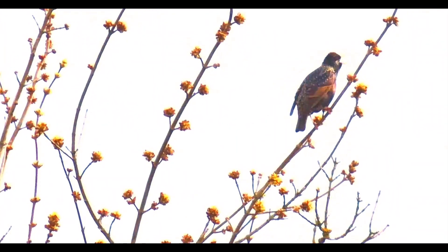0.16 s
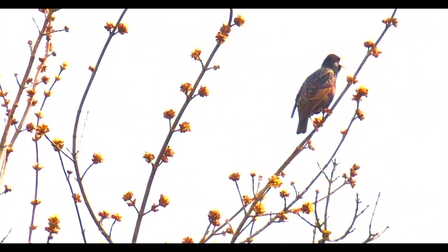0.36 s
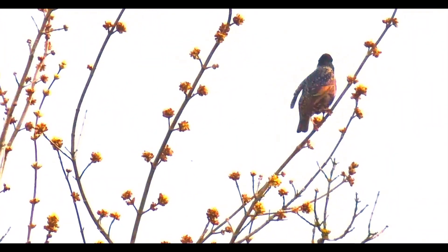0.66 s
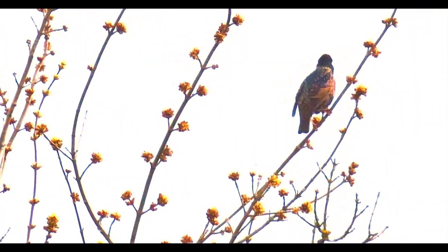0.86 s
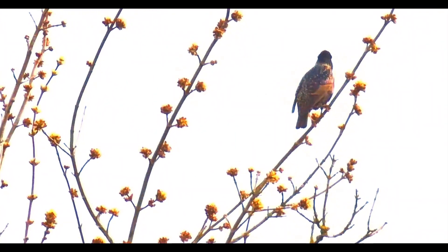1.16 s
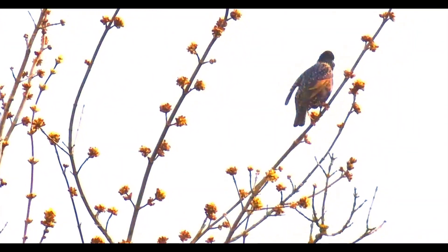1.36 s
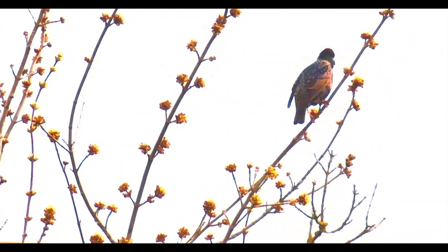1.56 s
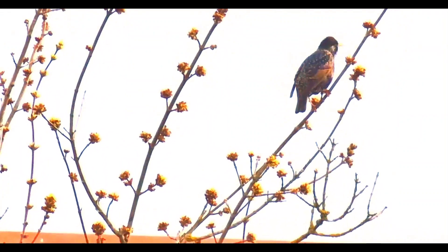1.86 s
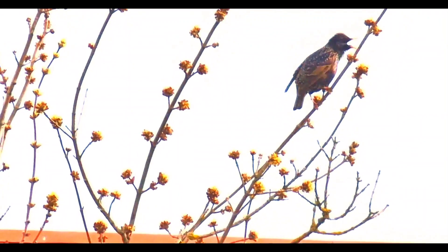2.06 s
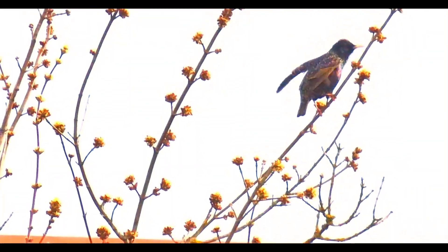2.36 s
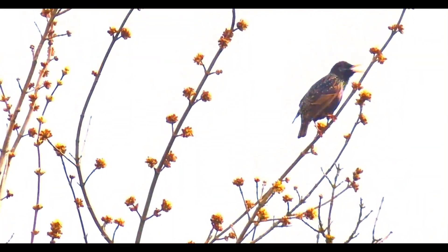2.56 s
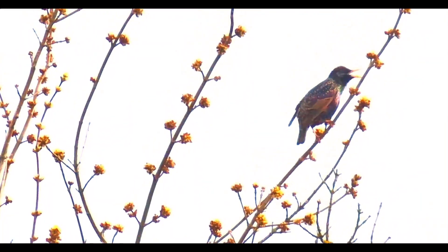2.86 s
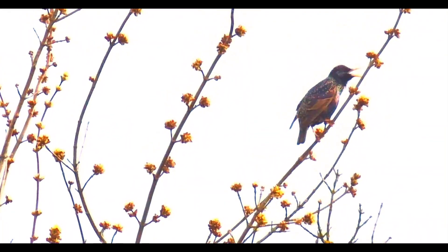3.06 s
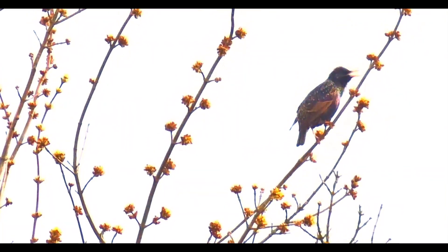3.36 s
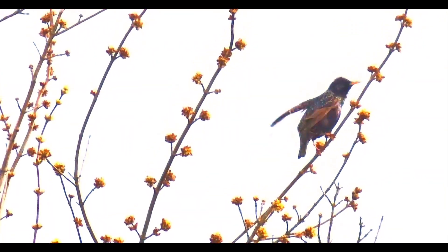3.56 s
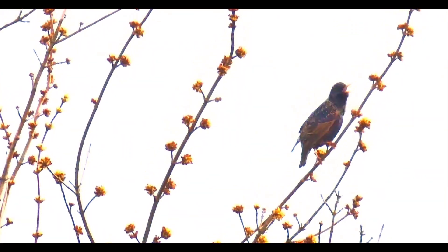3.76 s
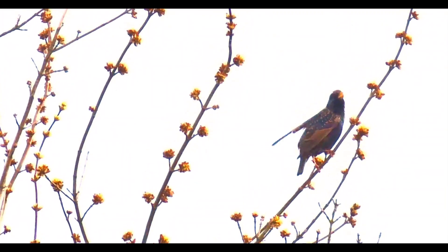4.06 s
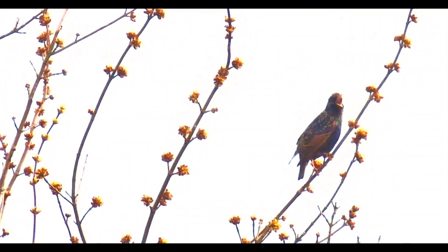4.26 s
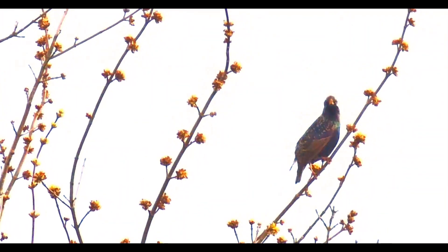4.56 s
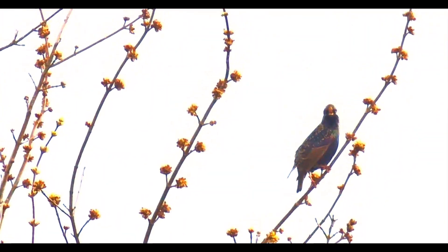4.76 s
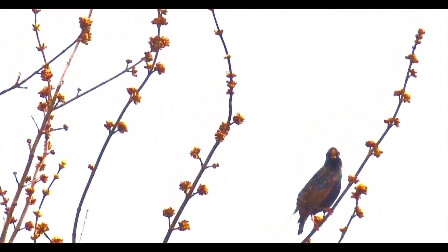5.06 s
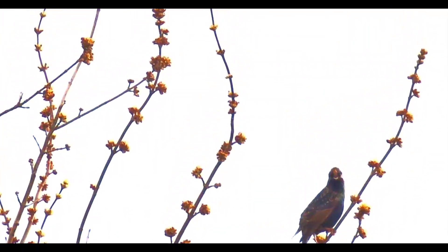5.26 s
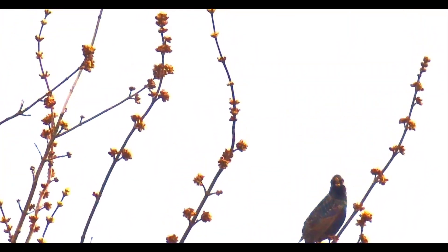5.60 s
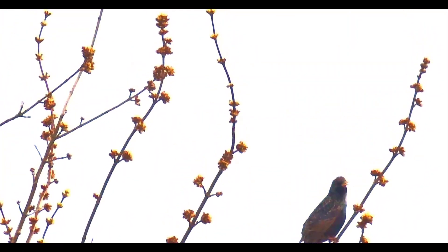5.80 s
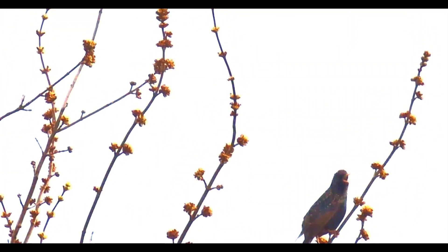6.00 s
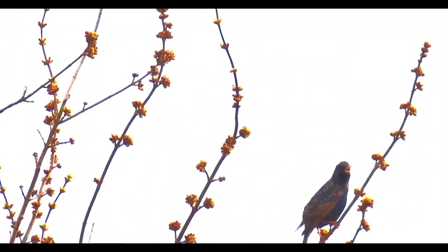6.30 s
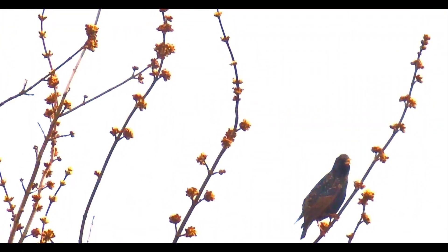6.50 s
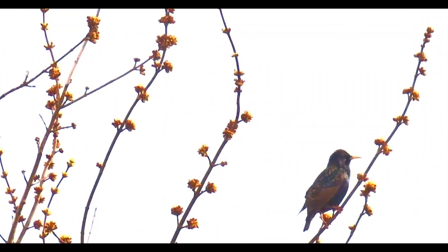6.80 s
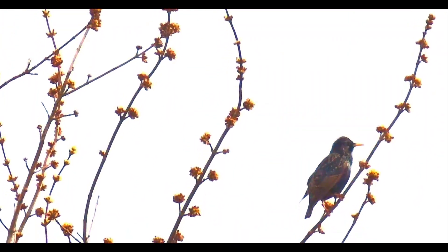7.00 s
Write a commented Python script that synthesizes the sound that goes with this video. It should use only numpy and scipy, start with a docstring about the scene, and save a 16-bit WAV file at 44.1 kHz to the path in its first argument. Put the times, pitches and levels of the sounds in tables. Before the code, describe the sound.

A starling rasps, trills thinly, clucks and whistles from a treetop among houses, over the steady rush and low drone of distant traffic.

```python
"""Starling among houses

A starling sings in a tree: rasps, high trills, clucks, and rising whistles that tumble down in pips.
Each voice is a sine on a moving pitch, roughened by random wobble and fast sweeps.
The song echoes off the walls, through decaying noise, and reaches two spaced microphone ports.
Behind it, shaped noise makes the steady rush of far traffic, and two wavering tones a low engine drone.
"""
import sys
import numpy as np
from scipy import signal
from scipy.fft import rfft, irfft, next_fast_len
from scipy.io import wavfile
from scipy.ndimage import map_coordinates

SR = 44100
rng = np.random.default_rng(int(sys.argv[2]) if len(sys.argv) > 2 else 0)


def to_wav(s):
    """Save 16-bit WAV."""
    ch = np.atleast_2d(s).T  # columns
    pcm = np.round(np.clip(ch, -1, 1) * 32767)  # PCM
    wavfile.write(sys.argv[1], SR, pcm.astype(np.int16))


N = 314874
TIME = np.arange(N) / SR

# Song levels are at the bird, before its facing and the yard; t is the onset.
# high pulsing trills; the swell's peak is counted from the onset and may lie past the end:
# (t/s, length/s, swell peak/s, start f/Hz, end f/Hz, peak level/dB, swell/dB)
TRILLS = [(2.149, 0.28, .13, 8740, 8590, -61.5, 5.5), (2.949, .282, 0.29, 8900, 8460, -57.5, 14.5),
          (3.779, 0.27, 0.35, 8860, 8430, -54.5, 7.5)]
DROP_S, DROP_HZ, DROP_DB = 0.029, 387, 5.5  # a trill ends in a quick droop
# rasps, a tone swept up and down very fast; the peak may lie past the end:
# (t/s, length/s, swell peak/s, start f/Hz, end f/Hz, sweep either side f/Hz, peak level/dB)
RASPS = [(0.105, 0.27, .19, 8610, 7050, 610, -60.5), (0.413, 0.17, 0.022, 6940, 8260, 1200, -63.5),
         (0.866, 0.08, 0.079, 7250, 6900, 655, -64), (0.933, 0.11, 0.02, 7450, 8000, 1100, -64),
         (1.074, .17, .035, 6660, 8480, 1150, -60.5), (1.564, .065, 0.075, 7120, 6990, 680, -65.5),
         (1.638, 0.1, 0.014, 7560, 7880, 880, -62), (1.772, 0.19, 0.066, 6770, 8680, 1080, -61.5)]
RASP_RISE_DB, RASP_FALL_DB = 11.5, 9.5  # swell and fade
RASP_SETTLE = 2  # exponent: higher settles the centre pitch earlier
CEILING_HZ = 8640  # the sweeps narrow as they near the top of the voice
# soft warbles from the low side of the syrinx: (t/s, length/s, start f/Hz, end f/Hz, level/dB)
WARBLES = [(0.197, 0.04, 4860, 3600, -67), (0.438, 0.13, 4990, 3870, -75), (1.107, .14, 5000, 3980, -74),
           (1.82, .14, 4660, 4080, -75.5), (2.613, 0.082, 5410, 4370, -75.5),
           (3.436, 0.13, 5170, 4050, -76), (5.607, 0.028, 5000, 4740, -74.5),
           (6.137, 0.062, 4700, 4610, -75.5)]
# slurs, plain gliding whistles: (t/s, length/s, start f/Hz, end f/Hz, level/dB)
SLURS = [(0.353, 0.068, 4800, 5730, -72.5), (0.793, 0.031, 4620, 4440, -75),
         (1.022, 0.067, 4830, 6040, -71), (1.48, 0.043, 4600, 4400, -76), (1.711, 0.053, 5060, 6150, -69.5),
         (4.25, 0.064, 6130, 7000, -83.5), (4.623, .08, 7260, 8400, -76.5),
         (5.136, 0.04, 6340, 6830, -76.5), (5.464, 0.11, 7100, 8380, -75), (7.062, 0.067, 4590, 4450, -84)]
# climbs, long whistles that scoop up to a shelf and then lift: (t/s, lift t/s, end t/s, shelf f/Hz, level/dB)
CLIMBS = [(4.594, 4.802, 4.855, 7170, -58.5), (5.424, 5.641, 5.705, 7154, -60)]
SCOOP_HZ, SCOOP_DB = 2000, 19  # how far below the shelf the whistle starts
SCOOP_S, CREEP_HZ_PER_S = .098, 2300  # time to reach the shelf, and the slow rise along it
LIFT_S, LIFT_HZ, LIFT_DB = .035, 510, -3.5  # the last step up
# quavers, rising whistles that break into slow vibrato: (t/s, length/s, start f/Hz, end f/Hz, level/dB)
QUAVERS = [(5.923, .265, 6470, 7820, -67)]
SWAY_AFTER_S = .114
# cascades, runs of falling pips, before the voice's strength by pitch:
# (t/s, length/s, top f/Hz, bottom f/Hz, first pip level/dB, last pip level/dB, lead-in flick level/dB)
CASCADES = [(4.366, 0.12, 7830, 4550, -43.5, -43, -52.5), (4.872, 0.04, 8340, 6270, -45.5, -42.5, -48),
            (5.217, .138, 8300, 4287, -41, -44, -57), (6.211, 0.1, 8040, 4200, -49.5, -41, -64)]
PIP_GAP_S = .017  # nominal; each run rounds to whole steps
# strength of a pip by its pitch: (f/Hz, level/dB)
PIP_VOICE = [(4200, -17.5), (4650, -13), (5500, -15.5), (6100, -19), (6500, -9.5), (7000, -9.5),
             (7400, -1.5), (8300, -2.5)]
# hiccups that announce each trill: (t/s, level/dB, held f/Hz)
HICCUPS = [(2.067, -61.5, 4630), (2.865, -63, 4620), (3.701, -60.5, 4840)]
# clucks: (t/s, level/dB, relative level of the last step/dB)
CLUCKS = [(4.152, -47.5, -14), (4.997, -51, -10), (5.804, -51.5, -6)]
# the first steps of one cluck: (delay t/s, length/s, f/Hz, relative level/dB)
CLUCK_STEPS = [(0, .03, 3095, -3), (0.015, 0.027, 2535, -4.5)]
# short bill ticks: (t/s, f/Hz, level/dB, pitch scatter f/Hz)
TICKS = [(.098, 3320, -67, 200), (.155, 3730, -67, 100), (5.682, 4200, -63.5, 900)]

# the bird turns its head towards the microphone: (t/s, direct sound level/dB)
FACING = [(1.9, -8), (2.1, -4)]
# decay time of the tail among the houses: (f/Hz, t60/s)
YARD_T60 = [(3000, 0.42), (5000, 1), (9000, 0.71)]
# the bird's balance at the two ports: (f/Hz, left minus right level/dB)
PORT_LEAN = [(3100, 0.5), (4400, -13.5), (6500, -6), (8000, -10.5)]
# phase by which the left port leads: (f/Hz, phase/rad)
PORT_LEAD = [(3000, 0.65), (4600, 2.4), (7000, 4.77), (8600, 3.8)]

# relative spectrum of the tyre rush: (f/Hz, level per Hz/dB)
TYRE_SPECTRUM = [(150, -0.5), (300, -3.5), (420, -5.5), (720, 1), (880, -2), (1030, 3.5), (1200, -4),
                 (1470, 0.5), (1800, -2), (2300, -15.5), (3000, -23), (9000, -34)]
# narrow humming bands in the traffic: (f/Hz, boost level/dB)
STREET_HUMS = [(246, 4), (310, 2.5), (665, 2.5), (750, 2.5), (1000, 0.5), (1060, 6.5), (1296, 5), (1470, 9),
               (1600, 1.5)]
# relative spectrum of the low rumble: (f/Hz, level per Hz/dB)
RUMBLE_SPECTRUM = [(15, -26), (30, -6), (47, 1), (60, 0), (110, -4), (160, -10.5), (220, -20), (350, -31.5),
                   (700, -75)]
# likeness of the noise at the two ports: (f/Hz, left-right correlation)
PORT_LIKENESS = [(100, 0.81), (250, 0.76), (1500, 0.46), (4000, 0.011)]
# engine pitches before waver: (t/s, low tone f/Hz, high tone f/Hz)
ENGINE_HZ = [(0, 73.85, 133), (2.85, 75.27, 128.1), (3.5, 93.3, 131.7), (4.7, 96.23, 134.2),
             (7.1, 93.76, 136.9)]
# engine's low exhaust tone, before trim and flutter: (t/s, level/dB)
ENGINE_LOW = [(0.0, -55), (0.54, -42.5), (0.79, -68.5), (1.31, -49.5), (1.83, -60.5), (2.26, -45.5),
              (2.5, -49.5), (2.62, -57), (2.82, -45.5), (4.06, -53.5), (4.53, -42.5), (5.01, -42),
              (5.37, -58), (5.69, -42.5), (6.42, -39.5), (6.48, -47), (6.94, -44), (7.14, -49.5)]
# engine's high tone, far off and then nearer, before trim and flutter: (t/s, level/dB)
ENGINE_HIGH = [(0.0, -83), (0.35, -63), (2.08, -68.5), (2.4, -53), (2.45, -57), (2.63, -46), (3.36, -58.5),
               (3.56, -46.5), (3.64, -60), (3.71, -47), (3.98, -62), (4.78, -51), (5.32, -63), (5.43, -47),
               (5.88, -47), (6.92, -58), (7.0, -47.5), (7.1, -50)]
PORT_LAG = 16 / SR  # s, the street reaches the left port this much later
TOP_HZ = 15700  # band limit of the microphone path


def amp(db):
    """Decibels to gain."""
    return 10 ** (np.asarray(db) / 20)


def unit(x):
    """Scale to rms 1."""
    return x / np.sqrt(np.mean(x ** 2) + 1e-20)


def along(points, hz):
    """(Hz, value) points read on a log axis."""
    f, v = np.transpose(points)
    return np.interp(np.log(hz + 1), np.log(f + 1), v)


def curves(rows, t):
    """Each column after the time, read at times t."""
    s, *cols = np.transpose(rows)
    return [np.interp(t, s, c) for c in cols]


def wobble(rate, t):
    """A smooth random curve with rate knots a second."""
    u = (t - t[0]) * rate
    return map_coordinates(rng.standard_normal(int(u[-1]) + 4), [u + 1], mode="mirror")


def turns(hz):
    """Running phase of a moving frequency."""
    return 2 * np.pi * np.cumsum(hz) / SR


def tone(hz):
    """A sine of rms 1 on a moving pitch."""
    return np.sqrt(2) * np.sin(turns(hz))


def filtered(x, response):
    """x times a response of frequency."""
    m = next_fast_len(N + SR // 2)
    return irfft(rfft(x, m) * response(np.fft.rfftfreq(m, 1 / SR)), m)[..., :N]


def add(track, s, sound):
    """Mix a sound into the track at time s."""
    part = track[max(round(s * SR), 0):][:len(sound)]
    part += sound[:len(part)]


def ramp(t, start, length):
    """Rises from 0 to 1 over length seconds from start."""
    return np.clip((t - start) / max(length, .001), 0, 1)


def note(length, fade):
    """Time since the start of a note, its progress 0-1, and its soft-edged gate."""
    t = np.arange(-fade / 2, max(length, .01) + fade / 2, 1 / SR)
    edge = np.clip(np.minimum(t - t[0], t[-1] - t) / fade, 0, 1)
    return t, np.clip(t / length, 0, 1), np.sin(edge * np.pi / 2) ** 2


def pip(hz, length, glide, rough_hz=110):
    """A short, slightly rough tone whose pitch slides by the share glide."""
    u = np.linspace(0, 1, round(length * SR))
    pitch = hz * (1 + glide * (u - .5)) + rough_hz * wobble(900, u * length)
    return np.sin(np.pi * u) ** 2 * tone(pitch)


def whistle(t, hz, db, waver=0.011, flutter_db=2.5):
    """A thin tone with a slight quiver."""
    return amp(db + flutter_db * wobble(98, t)) * tone(hz * (1 + waver * wobble(500, t)))


def starling(bright_hz=9000, wall_lean=0.39):
    """The whole song in its yard; the treble favours the right port and reaches the two out of step."""
    song = slurs() + climbs() + quavers() + trills() + hiccups() + rasps() + warbles() + cascades() + clucks()
    song = filtered(song, lambda hz: 1 / np.sqrt(1 + (hz / bright_hz) ** 60))
    direct_db, = curves(FACING, TIME)
    ports = np.array([[.5], [-.5]])

    def to_ports(hz):
        return amp(ports * along(PORT_LEAN, hz)) * np.exp(1j * ports * along(PORT_LEAD, hz))

    direct = filtered(song * amp(direct_db), to_ports)
    # what the bill does not send this way goes to the walls
    echoes = yard(song * amp(-direct_db / 2))
    walls = filtered(echoes, lambda hz: amp(wall_lean * ports * along(PORT_LEAN, hz)))
    return direct + walls


def slurs():
    """Quiet whistles that glide straight from one pitch to another."""
    out = np.zeros(N)
    for s, length, from_hz, to_hz, db in SLURS:
        t, u, gate = note(length, fade=0.012)
        add(out, s + t[0], gate * whistle(t, from_hz + (to_hz - from_hz) * u, db))
    return out


def climbs(bend=0.71):
    """The whistle gains strength as it scoops up, creeps along its shelf, then lifts and thins."""
    out = np.zeros(N)
    for s, lift_s, end_s, shelf_hz, db in CLIMBS:
        t, u, gate = note(end_s - s, fade=.015)
        below, lift = 1 - ramp(t, 0, SCOOP_S), ramp(t, lift_s - s, LIFT_S)
        creep_hz = CREEP_HZ_PER_S * np.maximum(t - SCOOP_S, 0)
        hz = shelf_hz - SCOOP_HZ * below ** bend + creep_hz + LIFT_HZ * lift
        add(out, s + t[0], gate * whistle(t, hz, db - SCOOP_DB * np.sqrt(below) + LIFT_DB * lift))
    return out


def quavers(vibrato_hz=19, swing_hz=330, throb_db=4, rise_db=17, fade_db=6):
    """A faint rising whistle swells and starts to sway, loudest at the top of each sway."""
    out = np.zeros(N)
    for s, length, from_hz, to_hz, db in QUAVERS:
        t, u, gate = note(length, fade=0.017)
        sway = np.sin(2 * np.pi * vibrato_hz * np.maximum(t - SWAY_AFTER_S, 0))
        rise = rise_db * (ramp(t, 0, SWAY_AFTER_S) ** 2 - 1)
        fall = fade_db * ramp(t, SWAY_AFTER_S, length - SWAY_AFTER_S)
        hz = from_hz + (to_hz - from_hz) * u + swing_hz * sway
        add(out, s + t[0], gate * whistle(t, hz, db + rise - fall + throb_db * sway))
    return out


def trills(pulse_hz=115, depth=0.44, swing_hz=70, under_db=-22, strand_db=-23, strand_hz=7520, rough_hz=50):
    """A high tone pulses fast as it sinks and swells, over a weak second strand and an octave-down partial."""
    out = np.zeros(N)
    for s, length, peak_s, from_hz, to_hz, db, swell_db in TRILLS:
        t, u, gate = note(length, fade=0.0072)
        droop = ramp(t, length - DROP_S, DROP_S)
        swell = -swell_db * abs(t / peak_s - 1)
        loud = gate * amp(db + swell - DROP_DB * droop + 3.1 * wobble(60, t))
        beat = turns(pulse_hz * (1 + 0.034 * wobble(38.6, t)))
        hoarse_hz = rough_hz + 300 * np.exp(-(t - t[0]) / 0.071)  # the note starts hoarse, then settles
        glide_hz = from_hz + (to_hz - from_hz) * u - DROP_HZ * droop
        hz = glide_hz + swing_hz * np.sin(beat) + hoarse_hz * wobble(900, t)
        low = amp(under_db) * tone(hz / 2 + 300 * np.sin(beat))
        # the strand peaks early in the note
        strand_level = strand_db + 6.5 - 44 * abs(t - .075)
        strand = amp(strand_level) * tone(strand_hz + 150 * wobble(800, t))
        add(out, s + t[0], loud * (1 + depth * np.cos(beat)) * (tone(hz) + low + strand))
    return out


def hiccups(sweep_db=-7, octave_db=-2, held_db=-3):
    """Two scratchy upward flicks with their octaves, then a hoarse tone that scoops up to its pitch and fades."""
    out = np.zeros(N)
    t, held_t = (np.arange(round(d * SR)) / SR for d in (.024, .07))
    u = t / t[-1]
    for s, db, held_hz in HICCUPS:
        for delay in (0, .018):
            hz = 2700 + 1700 * u + 200 * wobble(1550, t)
            flick = tone(hz) + amp(octave_db) * tone(2 * hz)
            add(out, s + delay, amp(db + sweep_db) * np.sin(np.pi * u) * flick)
        hz = held_hz - 1500 * np.exp(-held_t / .008) + 120 * wobble(700, held_t)
        add(out, s + 0.015, amp(db + held_db) * np.sin(np.pi * held_t / held_t[-1]) * tone(hz))
    return out


def rasps(sweep_rate_hz=200, scatter=0.08, flutter_db=3.0):
    """Uneven fast sweeps smear the tone into a scratchy band, which swells, settles in pitch and fades."""
    out = np.zeros(N)
    for s, length, peak_s, from_hz, to_hz, width_hz, db in RASPS:
        t, u, gate = note(length, fade=0.019)
        centre = to_hz + (from_hz - to_hz) * (1 - u) ** RASP_SETTLE
        rise = RASP_RISE_DB * (1 - ramp(t, 0, peak_s))
        fall = RASP_FALL_DB * ramp(t, peak_s, length - peak_s)
        beat = turns(sweep_rate_hz * (1 + 0.33 * wobble(120, t)))
        width = np.minimum(width_hz, CEILING_HZ - centre)
        hz = centre + width * (np.sin(beat) + scatter * wobble(2000, t))
        loud = gate * amp(db - rise - fall + flutter_db * wobble(107, t))
        add(out, s + t[0], loud * (1 + 0.3 * np.cos(beat)) * tone(hz))
    return out


def warbles(shake_hz=75, swing_hz=200, rough_hz=120):
    """Quiet falling notes with a wide, rough vibrato that also pulses their loudness."""
    out = np.zeros(N)
    for s, length, from_hz, to_hz, db in WARBLES:
        t, u, gate = note(length, fade=0.0084)
        beat = turns(shake_hz * (1 + 0.15 * wobble(50, t)))
        hz = from_hz + (to_hz - from_hz) * u + swing_hz * np.sin(beat) + rough_hz * wobble(800, t)
        add(out, s + t[0], gate * amp(db) * (1 + .5 * np.cos(beat)) * tone(hz))
    return out


def cascades(length=.0125, glide=-0.04, split_db=-6, split_below_hz=5500, flick_s=0.019, flick_rise_db=16,
             stray=0.009):
    """An upward flick, then pips in near-even steps down; the low ones scatter a rough band above them."""
    out = np.zeros(N)
    t = np.arange(round(0.045 * SR)) / SR
    for start, run_s, top_hz, bottom_hz, first_db, last_db, flick_db in CASCADES:
        flick_t, u, gate = note(flick_s, fade=.008)
        flick = gate * whistle(flick_t, 7200 + 1400 * u, flick_db - flick_rise_db * (1 - u))
        add(out, start - PIP_GAP_S - flick_s, flick)
        for step in np.linspace(0, 1, round(run_s / PIP_GAP_S) + 1):
            s = start + run_s * step - length / 2
            hz = top_hz * (bottom_hz / top_hz) ** step
            loud = amp(first_db + (last_db - first_db) * step + along(PIP_VOICE, hz))
            add(out, s, loud * pip(hz * (1 + stray * rng.standard_normal()), length, glide))
            if hz < split_below_hz:
                band = np.hanning(len(t)) * tone(hz * (1.15 + 0.14 * wobble(1500, t)))
                add(out, s, loud * amp(split_db) * band)
    return out


def clucks(scrape_db=-13, scrape_hz=4000, scrape_spread_hz=450, last_hz=1750, burr_db=-23, burr_hz=4050,
           tick_t60=0.15):
    """A scrape opens three tones that step down, then a soft burr follows; the bill ticks now and then."""
    out = np.zeros(N)
    t, burr_t = (np.arange(round(d * SR)) / SR for d in (.03, .17))
    for s, db, last_db in CLUCKS:
        scrape = np.hanning(len(t)) ** .5 * tone(scrape_hz + scrape_spread_hz * wobble(2000, t))
        add(out, s - .003, amp(db + scrape_db) * scrape)
        for delay, length, hz, step_db in CLUCK_STEPS + [(.028, .035, last_hz, last_db)]:
            add(out, s + delay, amp(db + step_db) * pip(hz, length, glide=0.033, rough_hz=96))
        burr = np.hanning(len(burr_t)) * tone(burr_hz + 200 * wobble(1100, burr_t))
        add(out, s + 0.049, amp(db + burr_db) * burr)
    for s, hz, db, scatter_hz in TICKS:
        decay = amp(db - 60 * t / tick_t60) * ramp(t, 0, .002)
        add(out, s - .003, decay * tone(hz + scatter_hz * wobble(1500, t)))
    return out


def yard(song, near_db=-8.5, near_t60=0.12, far_db=-11):
    """Near roofs blur the song and the houses around give a thin tail, both as decaying noise."""
    hz, t, z = signal.stft(rng.standard_normal((2, SR)), SR, nperseg=256)
    decay = amp(-60 * t / along(YARD_T60, hz)[:, None])
    tail = signal.istft(z * decay, SR, nperseg=256)[1][:, :SR]
    near = rng.standard_normal((2, SR)) * amp(-60 * TIME[:SR] / near_t60)
    answer = (amp(far_db) * unit(tail) + amp(near_db) * unit(near)) / np.sqrt(SR)
    return signal.fftconvolve(song[None], answer, axes=1)[:, :N]


def traffic(tyres_db=-58, rumble_db=-54, hiss_db=-85):
    """Far tyres rush over a low rumble, both shaped noise; a faint high hiss lies on top."""
    tyres = amp(tyres_db + 0.53 * wobble(6, TIME)) * rush(TYRE_SPECTRUM, STREET_HUMS)
    tyres = tyres * amp([[.7], [-.7]])  # a little louder at the left port
    tyres = filtered(tyres, lambda hz: 1 / np.sqrt(1 + (hz / 8500) ** 10))
    rumble = amp(rumble_db) * rush(RUMBLE_SPECTRUM)
    hiss = filtered(rng.standard_normal((2, N)), lambda hz: amp(along([(10000, -38.0), (11300, 4)], hz)))
    return tyres + rumble + amp(hiss_db) * hiss


def rush(spectrum, bands=(), width_hz=18):
    """Coloured stereo noise of rms 1 with narrow raised bands, most alike at both ports in the bass."""
    def colour(hz):
        raised = sum(db / (1 + ((hz - f) / width_hz) ** 2) for f, db in bands)
        return amp(along(spectrum, hz) + raised)

    def mid_side(hz):
        # the angle between mid and side sets the left-right likeness
        turn = np.arccos(np.clip(along(PORT_LIKENESS, hz), -1, 1)) / 2
        return colour(hz) * [np.cos(turn), np.sin(turn)]

    mid, side = filtered(rng.standard_normal((2, N)), mid_side)
    return unit(np.array([mid + side, mid - side]))


def engine(waver=0.01765, flutter_db=2, flutter_rate=14, low_db=-2.0, high_db=-1.5):
    """Two low exhaust tones waver, swell and fade on their way over the roofs."""
    low_hz, high_hz = curves(ENGINE_HZ, TIME)

    def level(rows, trim_db):
        return amp(trim_db + curves(rows, TIME)[0] + flutter_db * wobble(flutter_rate, TIME))

    def drone(hz):
        return tone(hz * (1 + waver * wobble(flutter_rate, TIME)))

    low = level(ENGINE_LOW, low_db) * drone(low_hz) * amp([[-1], [1]])  # leans to the right port
    return low + level(ENGINE_HIGH, high_db) * drone(high_hz)


def scene():
    """The bird sings ahead; the street reaches the right port a moment before the left."""
    sides = np.array([[1], [-1]])
    street = filtered(traffic() + engine(), lambda hz: np.exp(-1j * np.pi * hz * PORT_LAG * sides))
    return starling() + street


def record(dry):
    """The microphone path keeps nothing above its band limit."""
    return filtered(dry, lambda hz: hz < TOP_HZ)


dry = scene()
out = record(dry)
to_wav(out)
```